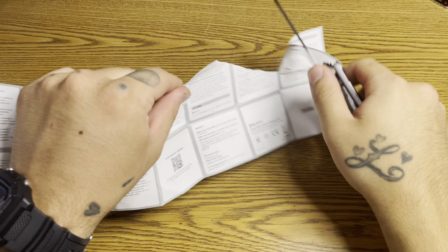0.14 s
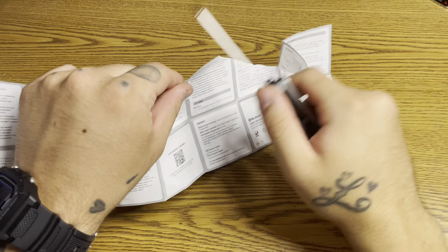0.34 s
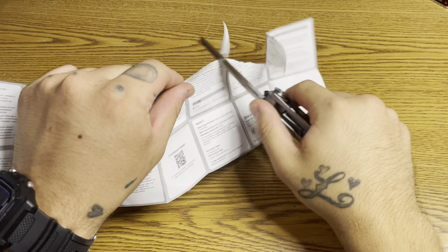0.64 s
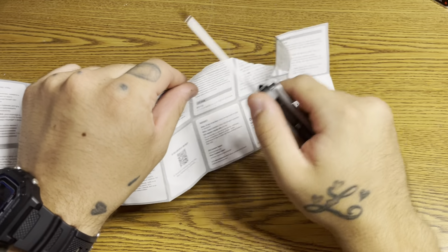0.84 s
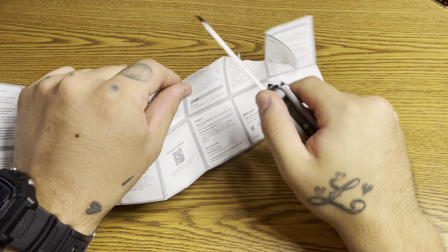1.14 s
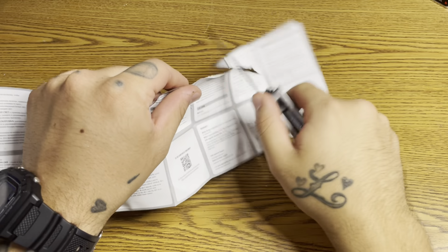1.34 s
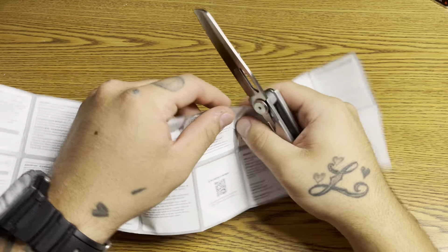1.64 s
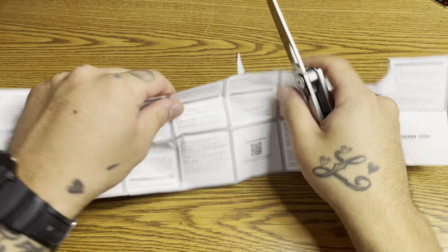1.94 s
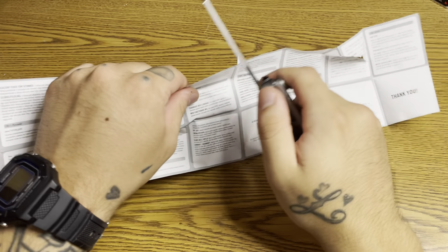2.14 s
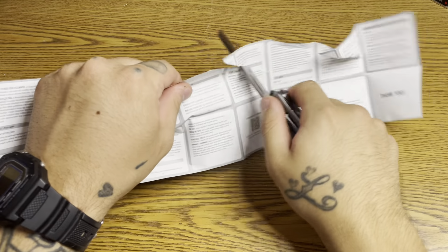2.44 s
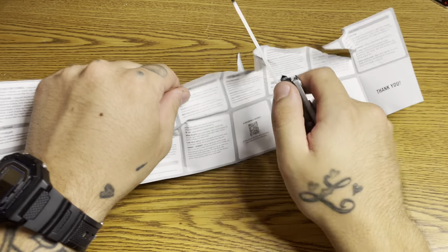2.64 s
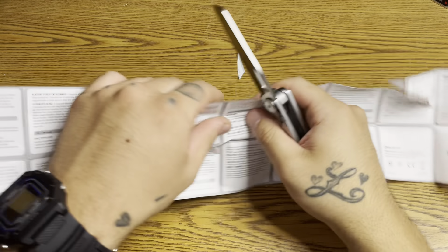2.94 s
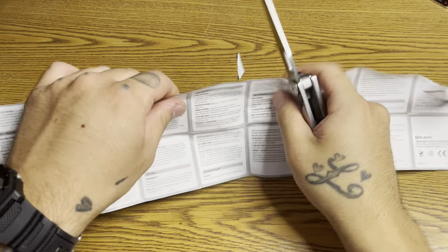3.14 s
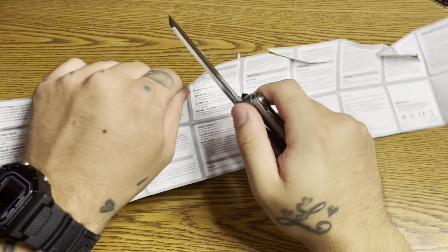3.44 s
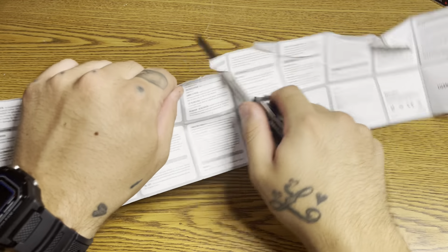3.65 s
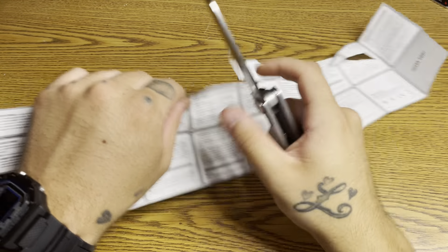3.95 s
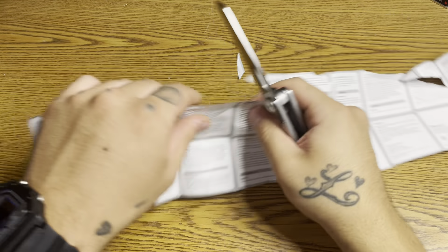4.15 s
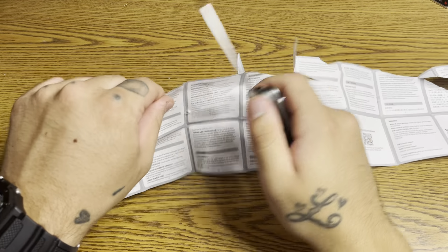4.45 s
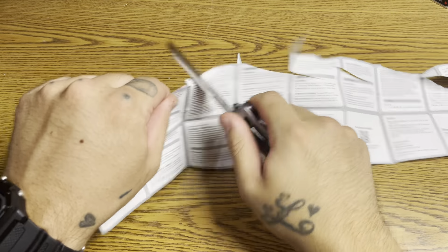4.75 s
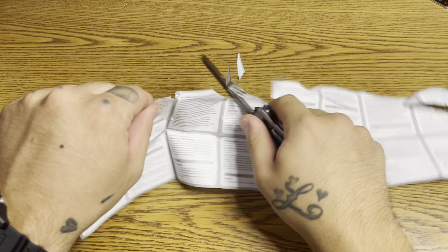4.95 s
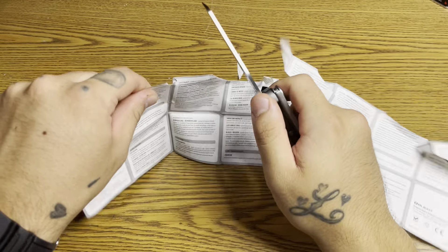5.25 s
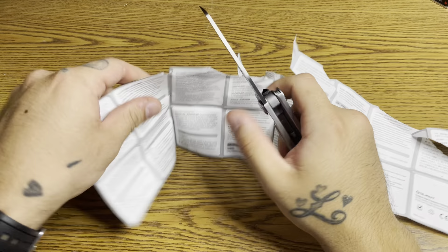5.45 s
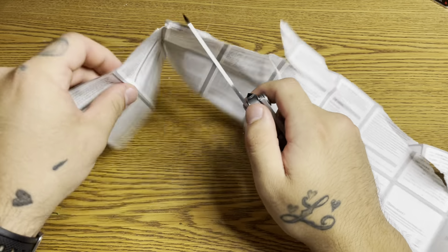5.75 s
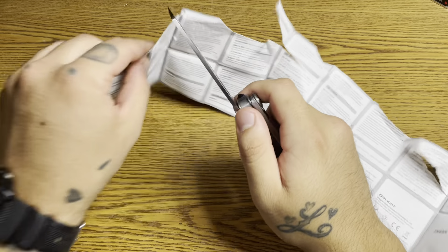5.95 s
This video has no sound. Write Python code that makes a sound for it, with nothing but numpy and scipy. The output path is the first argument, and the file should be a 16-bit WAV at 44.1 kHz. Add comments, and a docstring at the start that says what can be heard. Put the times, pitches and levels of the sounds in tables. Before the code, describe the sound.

Crisp paper being sliced in short irregular strokes, each a dense fibrous zip that ends suddenly. After the early cuts the paper is shifted with looser crackle, sharp little crease snaps and dull low thuds on wood. Two isolated slices follow in the middle, then a loud cluster of rips, a brief finger rub and light rustling. Close stereo pickup in a small, quiet room with a low hum-like rumble.

```python
"""Knife slicing a paper leaflet

A pocket knife cuts a folded leaflet on a wooden table, close to a pair of microphone ports.
Each stroke bites, runs and rips free: thousands of random fibre snaps ring the sheet through filtered registers.
Between strokes the paper slides with a looser crackle, wrinkles chirp, creases pop as noise bursts,
a finger judders over the sheet as resonated slips, and hands bump the table as sinking low tones.
A small room with a low rumble of coloured noise lies behind."""
import sys
import numpy as np
from scipy import signal
from scipy.fft import rfft, irfft, next_fast_len
from scipy.io import wavfile

SR = 44100
rng = np.random.default_rng(int(sys.argv[2]) if len(sys.argv) > 2 else 0)


def dump(signal):
    """Clip the signal to [-1, 1] and save it as 16-bit WAV at the path in sys.argv[1]."""
    limited = np.clip(np.atleast_2d(signal).T, -1, 1)
    pcm = np.round(limited * 32767).astype(np.int16)
    wavfile.write(sys.argv[1], SR, pcm)


N = 269451
HZ = np.fft.rfftfreq(4096, 1 / SR)  # frequency grid of the paper's filters


def amp(db):
    """Decibels to gain."""
    return 10 ** (np.asarray(db) / 20)


def unit(x):
    """Scales to energy 1."""
    return x / np.sqrt(np.sum(x ** 2) + 1e-20)


def read(points, hz):
    """Joins (Hz, value) points on a log-frequency axis."""
    f, value = np.transpose(points)
    return np.interp(np.log(hz + 1), np.log(f + 1), value)


def add(mix, s, sound):
    """Lays a sound into the mix at time s."""
    part = mix[max(round(s * SR), 0):][:len(sound)]
    part += sound[:len(part)]


def causal(gain):
    """The quickest-starting (minimum-phase) impulse response with this gain."""
    mirrored = np.r_[gain, gain[-2:0:-1]]
    log_gain = np.log(np.maximum(mirrored, 1e-5))
    spectrum = np.exp(np.conj(signal.hilbert(log_gain)))
    return np.fft.ifft(spectrum).real[:len(gain)]


def resonate(x, hz, width_hz):
    """A resonance of gain 1 that follows the curve hz: shift down to zero, low-pass, shift back."""
    turn = np.exp(2j * np.pi * np.cumsum(hz) / SR)
    r = np.exp(-np.pi * width_hz / SR)
    return 2 * (turn * signal.lfilter([1 - r], [1, -r], x / turn)).real


def dying_noise(t60):
    """Bending waves scattering from folds and edges: decaying noise of energy 1."""
    t = np.arange(len(HZ)) / SR
    return unit(rng.standard_normal(len(t)) * amp(-60 * t / max(t60, .002)))


def progress(start, end, tail_s):
    """One move of the hand: times, share done, an arch that peaks midway, seconds since the move ended."""
    step_s = .001
    s = np.arange(start, end + tail_s, step_s)
    done = np.clip((s - start) / (end - start), 0, 1)
    arch = 1 - (2 * done - 1) ** 2
    return s, done, arch, np.maximum(s - end, 0)


def cut(start, end, first_db, last_db, swell_db, flap_db, first_sizzle_db, last_sizzle_db, hz):
    """The blade bites, runs through the taut sheet and comes free: rows of (s, level, flap, sizzle, resonance)."""
    bite_db, bite_s = -7.5, 0.0026  # the edge starts this far below its level and catches this fast
    drop_db, drop_s = 12.5, 0.0055  # sudden drop as the blade comes free
    fade_db_per_s, tail_s = 306.5, .075  # then the sheet settles
    taut_db = 5.5  # in mid-stroke the sheet is taut and flaps less
    speed_sizzle_db = 1.5  # extra sizzle in mid-stroke, where the blade is fastest
    sink_octaves, late_power = 0.29, 4.6  # the resonance sinks, mostly late, as more paper comes free
    snags_per_s = 30.8  # the blade meets tougher and weaker paper at random
    snag_db, snag_octaves = 0.5, 0.12  # a tough patch is louder and lower
    rip_db, rip_s = 1, 0.028  # the last fibres rip with more body than sizzle

    s, done, arch, after = progress(start, end, tail_s)
    bite = np.exp((start - s) / bite_s)
    freed = 1 - np.exp(-after / drop_s)
    snag = np.interp((s - start) * snags_per_s, np.arange(len(HZ)), rng.standard_normal(len(HZ)))
    rip = rip_db * np.exp(-np.abs(s - end) / rip_s)

    level = first_db + (last_db - first_db) * done + swell_db * arch
    level = level + snag_db * snag + bite_db * bite - drop_db * freed - fade_db_per_s * after
    flap = flap_db - taut_db * arch
    sizzle = first_sizzle_db + (last_sizzle_db - first_sizzle_db) * done + speed_sizzle_db * arch
    sunk = sink_octaves * done ** late_power + snag_octaves * snag
    return np.column_stack([s, level + rip, flap, sizzle - rip, hz / 2 ** sunk])


def knife(cuts):
    """The edge breaks fibres so fast that they fuse into a rasp."""
    # colour of the cut paper: [f/Hz, relative density/dB]
    cut_colour = [(90, -31.5), (180, -0.5), (400, 0.5), (650, 0), (950, 3.5), (1400, -3), (2600, -2.5),
                  (3500, -0.5), (4800, -3.5), (5600, -7.5), (7000, -11.5), (9000, -10.5), (11500, -17),
                  (14000, -15), (16000, -24.5)]
    return friction(cuts, cut_colour, per_s=9000, spread_db=3.0, clump_db=2.5, clumps_per_s=420,
                    t60=0.027, ring_db=-3.0, free_db=1.0, free_width_hz=2940,
                    trim_db=(0.3, .8, 2.5), count=3)


def slide(start, end, first_db, last_db, flap_db, sizzle_db, hz):
    """The paper gets moving, swells and comes to rest in one colour: rows of (s, level, flap, sizzle, resonance)."""
    start_db, start_s = -4.5, 0.0086  # a push starts this far below its level and gets moving this fast
    swell_db = 2  # each push is fastest in its middle
    fade_db_per_s, tail_s = 335, .06  # the paper comes to rest
    s, done, arch, after = progress(start, end, tail_s)
    level = first_db + (last_db - first_db) * done + swell_db * arch
    level = level + start_db * np.exp((start - s) / start_s) - fade_db_per_s * after
    return np.column_stack(np.broadcast_arrays(s, level, flap_db, sizzle_db, hz))


def sliding(slides):
    """The leaflet drags over wood and skin with a looser crackle."""
    # colour of the dragged paper: [f/Hz, relative density/dB]
    slide_colour = [(90, -1.5), (180, 3), (500, -4.5), (900, -3), (1400, -8.5), (2400, -7), (3800, -3),
                    (5000, -6), (5700, -6.5), (9000, -10), (13000, -17), (16000, -19.5)]
    return friction(slides, slide_colour, per_s=4000, spread_db=3.0, clump_db=3.5, clumps_per_s=150,
                    t60=0.023, ring_db=-1.0, free_db=0.5, free_width_hz=2800,
                    trim_db=(-.8, -.7, 1.5), count=4)


def friction(strokes, colour, per_s, spread_db, clump_db, clumps_per_s, t60, ring_db,
             free_db, free_width_hz, trim_db, count=6):
    """Tiny snaps of uneven size come in clumps; each rings one of a few spots of the sheet."""
    out = np.zeros(N)
    filters = [causal(gain) for gain in registers(colour)]
    for rows in strokes:
        s, level, flap, sizzle, free_hz = np.transpose(rows)
        t = np.arange(s[0], s[-1], 1 / SR)
        chance = rng.random(SR)[:len(t)]
        size = rng.standard_normal(SR)[:len(t)]
        spot = rng.integers(0, count, SR)[:len(t)]
        clump_sizes = rng.uniform(-1.8, 1, len(HZ))
        clumps = np.interp((t - s[0]) * clumps_per_s, np.arange(len(HZ)), clump_sizes)
        snap_gain = amp(spread_db * np.abs(size) + clump_db * clumps)
        snaps = (chance < per_s / SR) * np.sign(size) * snap_gain
        rung = sum(signal.fftconvolve(snaps * (spot == k), sheet(t60, ring_db))[:len(t)]
                   for k in range(count))
        # the loose paper beside the contact resonates at the stroke's own pitch curve
        centre_hz = np.interp(t, s, free_hz)
        free = resonate(resonate(rung, centre_hz, free_width_hz), centre_hz, free_width_hz)
        rung = rung + amp(free_db) * free
        # crack, flap and sizzle each follow their own level curve
        for response, db, trim in zip(filters, (level, level + flap, level + sizzle), trim_db):
            band = unit(signal.fftconvolve(rung, response)[:len(t)]) * np.sqrt(len(t))
            add(out, s[0], band * amp(np.interp(t, s, db) + trim))
    return out


def sheet(t60, ring_db):
    """One spot of paper: a kick, then its ring."""
    ring = amp(ring_db) * dying_noise(t60)
    ring[0] = 1
    return unit(ring)


def registers(colour):
    """Splits the paper's sound into crack, flap and sizzle: three gains, each of power 1."""
    # resonances of the sheet held over the table: [f/Hz, width/Hz, boost/dB]
    body = [(412.5, 19, 8), (966, 150, 5), (1620, 43, 10), (2400, 410, 6.5), (2955, 140, 5), (3293, 140, 3),
            (3890, 17, -1.5), (4580, 180, 5), (4995, 41, 12.5)]
    body_db = sum(db / (1 + (2 * (HZ - hz) / width) ** 2) for hz, width, db in body)
    gain = amp(read(colour, HZ) + body_db)
    flap = 1 / (1 + (HZ / 1000) ** 6)
    below_sizzle = 1 / (1 + (HZ / 7500) ** 8)
    shares = [np.abs(below_sizzle - flap), flap, 1 - below_sizzle]
    return [unit(gain * np.sqrt(share)) * np.sqrt(len(HZ)) for share in shares]


def crinkles(strokes, per_s, size_db, spread_db, lowest_hz, highest_hz, cycles):
    """Small wrinkles give way one by one, each a brief sine at its own pitch, following level and flap."""
    out = np.zeros(N)
    t = np.arange(SR // 50) / SR
    for rows in strokes:
        s, level, flap = np.transpose(rows)[:3]
        span = s[-1] - s[0]
        for when, pitch, size in rng.random((500, 3))[:int(per_s * span)]:
            at = s[0] + when * span
            hz = lowest_hz * (highest_hz / lowest_hz) ** pitch
            # a weak flap holds the wrinkles back
            db = np.interp(at, s, level + np.minimum(flap, 0) / 2) + size_db + spread_db * size
            add(out, at, amp(db) * np.sin(2 * np.pi * hz * t) * np.exp(-hz * t / cycles))
    return out


def pops(crack_db=-2.5, sizzle_db=0.0, ring_db=0.0, buckle_t60=0.0086, panel_db=10.0, panel_octaves=0.96):
    """A crease flips over: a quick buckling burst, then the short ring of the panel beside it."""
    # creases popping and the blade catching:
    # [t/s, nominal level/dB, sizzle re level/dB, ring t60/s, panel resonance f/Hz]
    creases = [(0.2017, -60, -30, 0.02, 794), (0.272, -43.5, -39.5, 0.021, 1005),
               (.3277, -64, -33, .016, 745), (0.3805, -67, -9, .018, 1600), (0.4531, -38, -7, 0.031, 950),
               (0.494, -36.5, -9, .018, 1000), (.6631, -50, -1.5, .016, 850),
               (0.7167, -54.5, -20, 0.018, 800), (.936, -46.5, -10, .016, 1400),
               (0.9728, -34, -16, .012, 1760), (1.0551, -34.5, -13, 0.027, 1400),
               (1.2595, -36, 2, 0.026, 1800), (1.3135, -34, 3.5, .01, 1500), (1.346, -35, -7, 0.021, 1250),
               (1.502, -50, 3.5, 0.0175, 2100), (1.606, -48.5, -7, .023, 650),
               (1.6546, -33.5, -4.5, 0.088, 2000), (1.6985, -44, -8, 0.02, 1300),
               (1.7668, -33, -10, 0.011, 1010), (1.8052, -42.5, -7, 0.027, 857),
               (1.864, -30, 0, 0.041, 1330), (1.9513, -29, -9.5, 0.034, 1500), (1.967, -26, 4, 0.02, 1090),
               (2.0541, -49.5, -11, 0.016, 700), (2.103, -50.5, -12, 0.03, 664),
               (2.3342, -29.5, -20.5, 0.025, 2420), (2.6246, -34.5, -11, .016, 2680),
               (2.8663, -41, -14, .014, 980), (2.8816, -31.5, -18.5, 0.02, 1276),
               (2.9572, -41, -11.5, 0.021, 890), (2.9812, -39.5, -15, 0.011, 1900),
               (3.0415, -34.5, 0, 0.012, 900), (3.096, -35, -4.5, 0.02, 1170),
               (3.134, -31, -1, 0.054, 1800), (3.2442, -49.5, -4.5, 0.021, 900),
               (3.2902, -44.5, -19.5, 0.023, 1450), (3.7725, -35, -17, 0.017, 1140),
               (3.8081, -31, -11, 0.018, 1760), (4.0855, -39, -27, 0.015, 2190),
               (4.099, -35.5, -22, 0.018, 1010), (4.131, -36.5, 1, 0.027, 1500),
               (4.2586, -44, 2.5, .018, 1400), (4.276, -28.5, -28, 0.019, 3030),
               (4.32, -35, -21, 0.0062, 2240), (4.3672, -49, -22, .021, 860),
               (4.387, -45.5, -33, .018, 1300), (4.4038, -60.5, 7, .014, 1090),
               (4.685, -36.5, -3, 0.031, 1380), (4.743, -25.5, 2, 0.039, 2400),
               (4.7928, -38.5, 8, .016, 1400), (5.2925, -47, -22, 0.019, 590),
               (5.421, -46, -6, 0.017, 1500), (5.5933, -47, 0, 0.013, 1010), (5.7141, -40, -3, .017, 3470),
               (5.7721, -38.5, -8.5, 0.02, 1300), (5.8723, -33.5, -15, 0.038, 1500),
               (6.0575, -47, -3, 0.02, 1300), (6.1028, -47, 8, 0.06, 1400)]
    # colour of a pop: [f/Hz, relative density/dB]
    pop_colour = [(90, -18.5), (200, 2), (450, -1.5), (900, 0), (1400, -2.5), (2400, 0), (4500, -6),
                  (6000, -12.5), (9000, -15.5), (13000, -24), (16000, -26)]
    # flap re level for a 1 kHz panel; smaller, higher panels flap less
    flap_db, flap_db_per_octave = 1.5, -9.5
    out = np.zeros(N)
    crack, flap, sizzle = registers(pop_colour)
    kick = np.sqrt(.008 * SR)  # levels are rms over 8 ms
    for s, level, high, t60, panel_hz in creases:
        low = flap_db + flap_db_per_octave * np.log2(panel_hz / 1000)
        octaves_off = np.log2((HZ + 1) / panel_hz)
        panel = amp(panel_db * np.exp(-.5 * (octaves_off / panel_octaves) ** 2))
        parts = [(crack, crack_db), (flap, low), (sizzle, high + sizzle_db)]
        power = sum((unit(part * panel) * amp(db)) ** 2 for part, db in parts)
        gain = np.sqrt(len(HZ) * power)
        burst = unit(dying_noise(buckle_t60) + amp(ring_db) * dying_noise(t60))
        add(out, s, kick * amp(level) * signal.fftconvolve(burst, causal(gain)))
    return out


def judder(slips_per_s=1800):
    """Skin sticks and slips on the paper; the resonance sinks as the sheet bends."""
    # a finger juddering over the sheet:
    # [start t/s, loudest t/s, end t/s, level/dB, middle resonance f/Hz, sinking/octaves, nominal width/Hz]
    rubs = [(5.107, 5.118, 5.175, -41, 1015, .1, 202), (5.174, 5.213, 5.26, -39.5, 995, 0.05, 260),
            (5.596, 5.605, 5.64, -38.5, 1810, 0.45, 700), (5.67, 5.693, 5.71, -31, 1980, 1, 566)]
    swell_db = 15.5  # a rub rises and falls by this much
    out = np.zeros(N)
    for start, loudest, end, level, mid_hz, sink, width in rubs:
        t = np.arange(start, end, 1 / SR)
        place = np.interp(t, [start, loudest, end], [-1, 0, 1])
        slips = ((rng.random(SR) < slips_per_s / SR) * rng.uniform(-1.17, 1, SR))[:len(t)]
        hz = mid_hz * 2 ** (-sink * place / 2)
        # two wide passes make one narrower resonance
        ring = resonate(resonate(slips, hz, 2 * width), hz, 2 * width)
        add(out, start, unit(ring) * np.sqrt(len(t)) * amp(level - swell_db * place ** 2))
    return out


def bumps(rise_s=0.00021, sag=0.12):
    """A cushioned push rings a few low cycles, sinking as the contact relaxes."""
    # soft bumps of the hands and the leaflet on the table: [t/s, level/dB, middle pitch f/Hz]
    knocks = [(0.515, -42.5, 215), (1.27, -25, 321), (1.703, -34.5, 209), (1.867, -26, 191),
              (2.414, -28, 250), (2.531, -31, 221), (2.958, -37.5, 180), (3.004, -31, 154),
              (3.043, -32.5, 202), (3.211, -38, 210), (4.23, -35.5, 174), (4.752, -23, 408),
              (4.793, -30.5, 265), (5.593, -33.5, 428), (5.813, -38.5, 512), (5.875, -39, 253)]
    t60 = 0.043
    out = np.zeros(N)
    t = np.arange(SR // 5) / SR
    for s, level, hz in knocks:
        # the pitch slides from sag above its middle to sag below
        turns = np.cumsum(hz * (1 + sag * (2 * amp(-30 * t / t60) - 1))) / SR
        envelope = amp(level - 60 * t / t60) * (1 - np.exp(-t / rise_s))
        add(out, s, envelope * np.sin(2 * np.pi * turns))
    return out


def echoed(x):
    """Nearby surfaces repeat the sound within a few milliseconds."""
    # early echoes from the table top, the hands and other close surfaces: [delay t/s, level/dB]
    echoes = [(.0013, -35.5), (.0029, -45.5), (.0047, -15.5), (.0083, -21), (0.0139, -20)]
    out = x.copy()
    for delay, db in echoes:
        add(out, delay, amp(db) * x)
    return out


def scatter(x):
    """The same sound with ever-changing phases, as it arrives from many places on the sheet."""
    z = signal.stft(x, nperseg=128)[2]
    phases = np.exp(2j * np.pi * rng.random(z.shape))
    turned = signal.istft(z * phases, nperseg=128)[1][:N]
    return unit(turned) * np.linalg.norm(x)


def ports(x):
    """The two ports hear the wide sheet with different phase, level and scatter."""
    # phase by which the left port leads: [f/Hz, lead/rad]
    port_lead = [(100, 0.1), (1050, 1.0), (1350, 0.91), (2000, 0.5), (3300, 1.5), (4100, 0.92), (5000, 0.6),
                 (5800, -1.5), (6700, -1.4), (7600, -2.8), (8700, -3.14), (10000, -4.1), (11500, -5.1),
                 (13200, -6.28)]
    # level between the ports: [f/Hz, left minus right/dB]
    port_balance = [(250, 0), (700, 2), (1400, 4), (2400, 1.5), (4500, 4.5), (6000, 2), (8500, 0)]
    # how alike the ports are: [f/Hz, likeness/0-1]
    port_likeness = [(200, 0.98), (900, 0.82), (1500, 0.76), (2500, 0.58), (4000, 0.61), (5400, 0.079),
                     (7000, 0.65), (8300, 1), (9000, 0.96), (10500, 0.79), (12500, 0.95), (13300, 0.98)]
    # where the paper sounds as the hands move, used about its mean: [t/s, left minus right/dB]
    hand_place = [(0.0, 1.5), (2.12, 4.0), (2.14, 2), (3.18, 4.5), (3.23, 2), (4.86, 3.5), (6.1, 3.0)]

    size = next_fast_len(N + SR // 8)
    hz = np.fft.rfftfreq(size, 1 / SR)
    like = np.clip(read(port_likeness, hz), 0, 1)
    shared = rfft(x + room(x), size) * np.sqrt((1 + like) / 2)
    apart = rfft(scatter(x) + room(x), size) * np.sqrt((1 - like) / 2)
    lean = amp(read(port_balance, hz) / 2)
    left = (shared + apart) * lean
    right = (shared - apart) / lean * np.exp(-1j * read(port_lead, hz))
    pair = np.array([left, right])
    # only the middle of the range follows the hands from side to side
    middle_gain = read([(250, 0), (600, 1), (6500, 1), (8500, 0)], hz)
    middle = irfft(pair * middle_gain, size)[:, :N]
    s, place = np.transpose(hand_place)
    sway = np.interp(np.arange(N) / SR, s, place - place.mean()) / 2
    return irfft(pair, size)[:, :N] + middle * (amp([sway, -sway]) - 1)


def room(x, wet_db=-15):
    """A faint noise tail from the walls, dying soonest in the highest treble."""
    # decay of the room: [f/Hz, t60/s]
    decay = [(150, 0.33), (1000, 0.16), (4000, 0.17), (9000, 0.21), (16000, 0.091)]
    hz, t, z = signal.stft(rng.standard_normal(SR // 2), SR, nperseg=256)
    fade = amp(-60 * t / read(decay, hz)[:, None]) * (t > .005)
    tail = signal.istft(z * fade, SR, nperseg=256)[1]
    return amp(wet_db) * signal.fftconvolve(x, unit(tail))[:N]


def rumble():
    """Steady low noise of the room, nearly alike at both ports."""
    # colour of the rumble: [f/Hz, relative density/dB]
    rumble_colour = [(20, -35.5), (35, -15.5), (55, 3), (75, 1.5), (95, -7), (125, -2), (170, -12),
                     (350, -18), (600, -29.5), (1200, -38.5), (3000, -43.5), (8000, -58), (16000, -49.5)]
    level_db = -54  # rms of the part that both ports share
    apart_db = -13.5  # the part that differs between the ports, re the shared part
    colour = amp(read(rumble_colour, np.fft.rfftfreq(N, 1 / SR)))
    shared, apart = (unit(irfft(rfft(rng.standard_normal(N)) * colour, N)) for _ in range(2))
    apart = apart * amp(apart_db)
    return amp(level_db) * np.sqrt(N) * np.array([shared + apart, shared - apart])


def scene():
    """All the paper sounds and table bumps over the room's rumble."""
    # knife strokes: [start t/s, end t/s, nominal start level/dB, nominal end level/dB, mid swell/dB,
    # flap re level/dB, start sizzle re level/dB, end sizzle re level/dB, free paper resonance f/Hz]
    knife_strokes = [(0, 0.094, -28, -36.5, -1.5, -5, -4, -1.5, 2500),
                     (0.099, 0.147, -35.5, -41, 3, -5, -4.5, -11, 1460),
                     (0.512, 0.659, -35, -40, -2, -5, 0, 3.5, 2250),
                     (0.926, .99, -44.5, -39.5, 4, -6, 1, 0, 1710),
                     (1, 1.102, -43.5, -58, -5.5, -4, 2.5, 7.5, 1620),
                     (1.253, 1.317, -36.5, -34, 7.5, -4, -7, -1, 2070),
                     (1.325, 1.37, -44, -48.5, -3, 0.5, 3, -7.5, 1334),
                     (2.336, 2.525, -36, -32, 3, -5, 3.5, -5, 2110),
                     (3.58, 3.772, -33, -35.5, 5, -10.5, 4.5, -6.5, 2380),
                     (4.731, 4.798, -29.5, -31.5, 0, 0, 2.5, 2.5, 2300),
                     (4.817, 4.829, -27, -34, -1.5, -1, 1, 2.5, 1280),
                     (4.874, 5.001, -29.5, -24, 0, -8, 2.5, -7, 2400)]
    # pushes of the paper over the table: [start t/s, end t/s, nominal start level/dB,
    # nominal end level/dB, flap re level/dB, sizzle re level/dB, free paper resonance f/Hz]
    pushes = [(0.717, .85, -72, -73.5, 4, -6, 1100), (1.157, 1.22, -75, -81, 8, -4, 1100),
              (1.456, 1.645, -60.5, -56, -1, -6.5, 1430), (1.645, 1.737, -46, -46.5, -1, 0, 1600),
              (1.749, 1.879, -38, -49, -3.5, -2.5, 1150), (1.921, 1.985, -43.5, -49.5, -6, -12.5, 1150),
              (1.986, 2.154, -52, -61.5, -8.5, -3, 1160), (2.201, 2.32, -61, -64.5, -7.5, -8, 1700),
              (2.564, 2.63, -50.5, -52.5, -12.5, 1.5, 1940), (2.637, 2.75, -63.5, -54.5, -9.5, -3.5, 2380),
              (2.748, 2.83, -49, -45.5, -18, -1, 2700), (2.861, 3.029, -41.5, -44.5, -5.5, -2.5, 1130),
              (3.04, 3.107, -44, -47, -1.5, -1, 1100), (3.134, 3.165, -43, -49.5, 2.5, -1, 1500),
              (3.167, 3.4, -57, -63, -0.5, -10, 1060), (3.416, 3.48, -62, -62.5, -9.5, -0.5, 1450),
              (3.511, 3.573, -78, -58, 0, -1, 1300), (3.806, 3.93, -57.5, -64.5, -6.5, 1.5, 2450),
              (3.939, 4.047, -51.5, -46, -35.5, 2.5, 3730), (4.072, 4.272, -43.5, -46, -2, -2, 1350),
              (4.275, 4.39, -53, -61, -1, -12, 1800), (4.431, 4.55, -63, -60, 3, -8, 960),
              (5.054, 5.106, -55.5, -55, -3, -6, 1150), (5.108, 5.16, -48, -47.5, -13, -10, 1600),
              (5.181, 5.227, -46.5, -42, -14, -7.5, 1700), (5.279, 5.41, -70, -56, 0, -1.5, 1050),
              (5.422, 5.53, -43.5, -43, -3.5, -4, 1470), (5.589, 5.635, -43, -50, 3.5, -9, 1800),
              (5.702, 5.84, -52, -52, -1.5, -1.5, 1500), (5.875, 5.931, -54, -56.5, 2.5, -5, 1650),
              (5.955, 6.072, -52, -57, -4.5, -1.5, 1350)]
    cuts = [cut(*row) for row in knife_strokes]
    slides = [slide(*row) for row in pushes]
    torn = crinkles(cuts, per_s=150, size_db=5.0, spread_db=7, lowest_hz=700, highest_hz=5330, cycles=1.53)
    bent = crinkles(slides, per_s=70, size_db=3.5, spread_db=13, lowest_hz=470, highest_hz=3440, cycles=2.6)
    paper = knife(cuts) + torn + sliding(slides) + bent + pops() + judder()
    return ports(echoed(paper) + bumps()) + rumble()


def record(dry):
    """The microphone's low cut, then a steep treble limit."""
    low_cut_hz, edge_hz = 34, 15850
    low_cut = signal.butter(4, low_cut_hz, "high", fs=SR, output="sos")
    thinned = signal.sosfilt(low_cut, dry)
    band_limit = signal.firwin(511, edge_hz, window=("kaiser", 9), fs=SR)
    return signal.oaconvolve(thinned, band_limit[None], "same")


dry = scene()
out = record(dry)
dump(out)
```